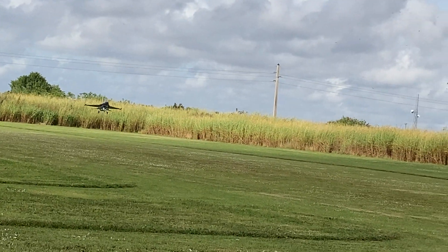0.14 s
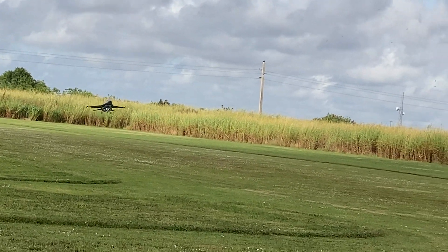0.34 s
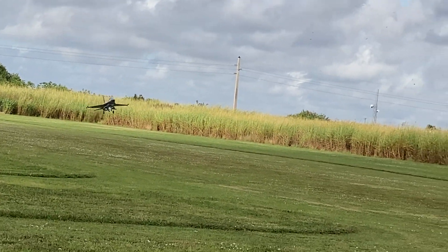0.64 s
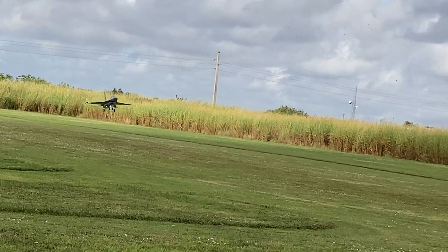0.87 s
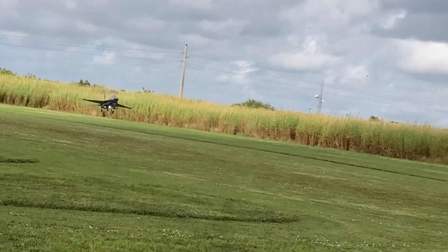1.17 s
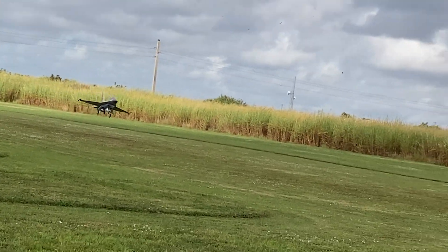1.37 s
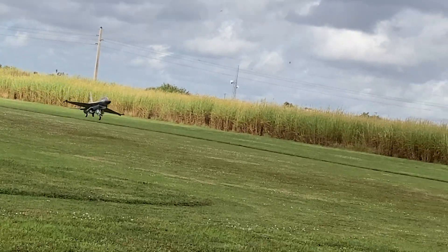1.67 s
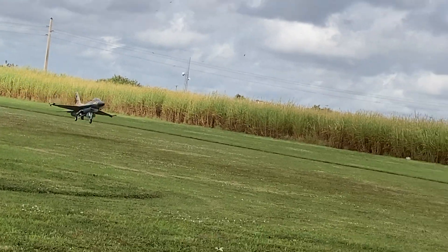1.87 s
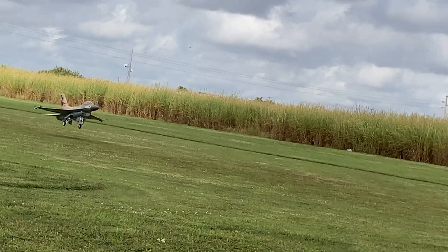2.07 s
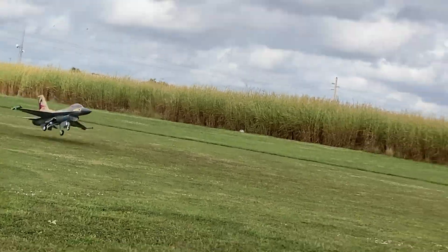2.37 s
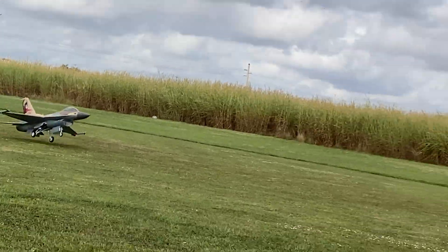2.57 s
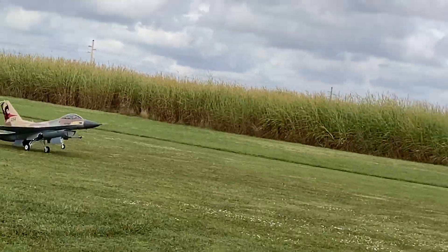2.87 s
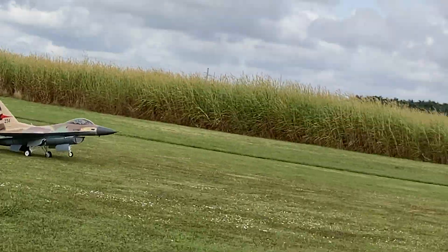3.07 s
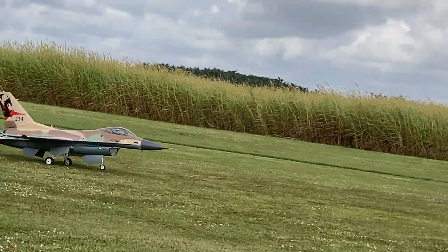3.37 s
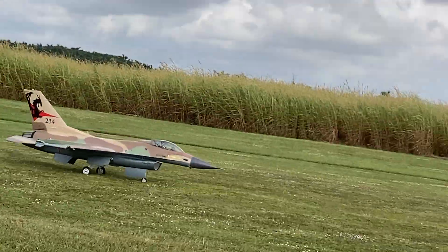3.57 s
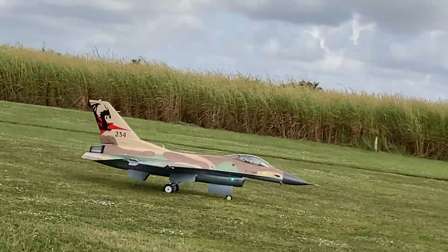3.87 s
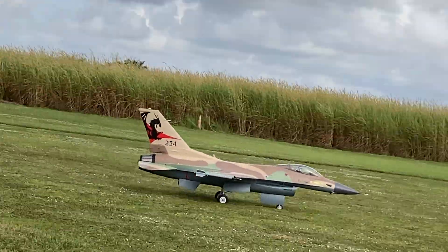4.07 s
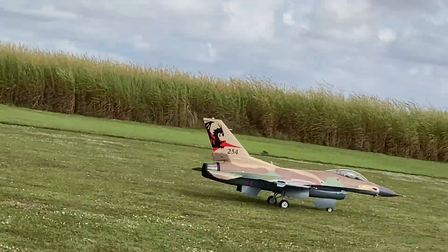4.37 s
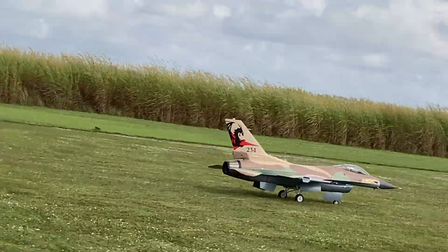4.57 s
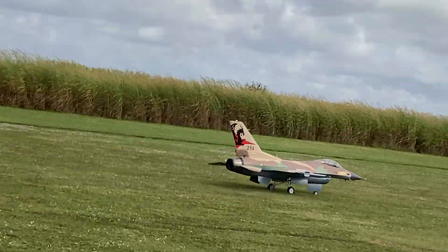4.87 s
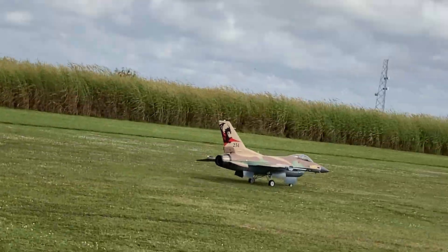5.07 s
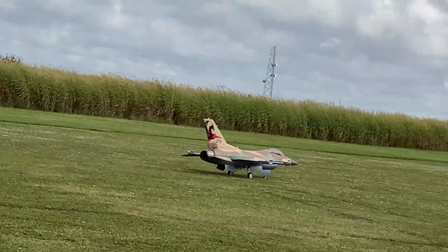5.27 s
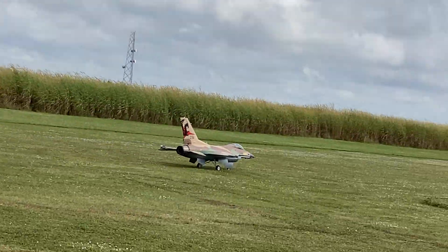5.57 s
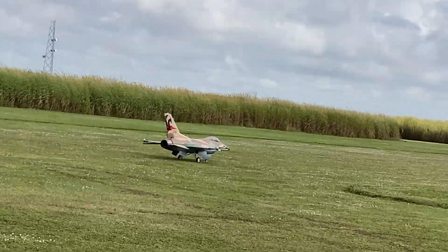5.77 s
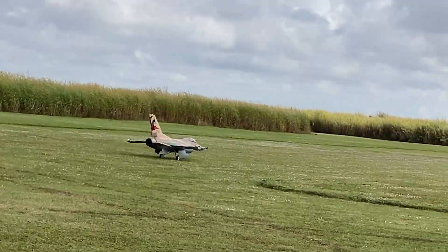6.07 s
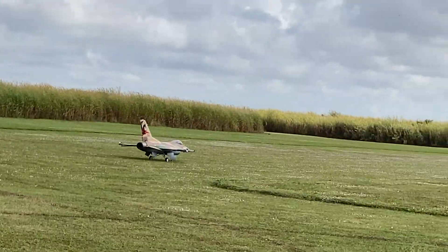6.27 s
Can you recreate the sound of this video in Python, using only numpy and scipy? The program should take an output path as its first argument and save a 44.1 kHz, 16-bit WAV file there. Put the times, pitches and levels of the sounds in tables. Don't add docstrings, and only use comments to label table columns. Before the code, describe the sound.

Outdoors on a windy grass field, a model jet approaches with a thin, very high turbine whine over airy hiss. From 0 to 1.6 seconds the pitch climbs, twinkling and wavering, with a low wind moan and a thump at 0.2. A faint dove note ends at the start; another rises at 1.4. Whine and roar peak sharply around 1.7 with a gust thump, then the pitch slides down continuously. Piercing higher whine flares near 2.5 and 3.4 amid flickering hiss, soft wheel scuffs and small wind thuds between 2.6 and 3.7. The roar thins to its quietest near 3.5. From about 4.1 a rougher exhaust wash returns with low rolling rumble as the tail turns toward the microphone. Heavy gust blows strike at 5.15 to 5.35; then the jet recedes, whine sinking and fading, grass rustling, a tiny tick at 6.1 and a last thump at 6.36.

```python
import sys
import numpy as np
from scipy import signal
from scipy.fft import rfft, irfft, next_fast_len
from scipy.io import wavfile
from scipy.ndimage import uniform_filter1d

SR = 44100
rng = np.random.default_rng(int(sys.argv[2]) if len(sys.argv) > 2 else 0)


def boost(x):
    u = np.asarray(x, float) / 20
    return 10 ** u


def store_pcm(level_fs):
    pcm = np.round(np.clip(level_fs, -1, 1) * 32767).astype(np.int16)
    wavfile.write(sys.argv[1], SR, np.atleast_2d(pcm).T)


N = 283122

# centre in seconds, half width in seconds, second blade order in dB, hiss in dB.
EDDIES = [(0.182, 0.033, 10, 8), (0.183, 0.067, 0.2, -15), (0.244, 0.03, -5.4, 3), (0.509, 0.19, -13.5, -8),
          (1.107, 0.041, 5.5, 4.8), (1.318, 0.061, -13, 1), (1.529, 0.09, -5.2, -9),
          (1.578, 0.028, -11.9, 2.8), (1.686, 0.082, -13, -6.1), (1.978, 0.022, -22, -5.5),
          (1.983, 0.035, 11.1, 11), (2.132, 0.013, -12.7, -2.5), (2.219, 0.03, 4.5, 1.5),
          (2.31, 0.057, -7, -11.0), (2.662, 0.03, 15, 10.5), (2.743, 0.026, -12, -9),
          (2.795, 0.05, 4, 12.5), (2.924, 0.088, -10.5, 3), (2.936, 0.045, 12, 9.5),
          (3.044, 0.021, -18, -12), (3.317, 0.074, -11.5, -5.5), (3.416, 0.051, 3.5, -2.5),
          (3.645, 0.084, 10.5, 2), (4.789, 0.11, -19, 8), (5.043, 0.17, -16, 12.5), (5.255, 0.028, 8, 4.5),
          (5.366, 0.046, 3, 7), (5.461, 0.041, 1, 3)]


def read(points, hz):
    f, value = np.transpose(points)
    return np.interp(np.log(hz + 1), np.log(f + 1), value)


def curve(rows, t):
    s, *columns = np.transpose(rows)
    return np.array([np.interp(t, s, c) for c in columns])


def arcs(points, t):
    s, v = np.transpose(points)
    slope = np.gradient(v, s)
    i = np.clip(np.searchsorted(s, t) - 1, 0, len(s) - 2)
    span = np.diff(s)[i]
    u = (t - s[i]) / span
    rise = u * u * (3 - 2 * u)
    bend = span * u * (1 - u) * (slope[i] * (1 - u) - slope[i + 1] * u)
    return v[i] + (v[i + 1] - v[i]) * rise + bend


def bumps(rows, t):
    s, width, *columns = np.transpose(rows)
    bells = np.exp(-((t - s[:, None]) / np.maximum(width, .01)[:, None]) ** 2)
    return np.array(columns) @ bells


def wander(shape, *spans):
    x = rng.standard_normal(shape)
    for axis, span in enumerate(spans):
        for _ in range(2):
            x = uniform_filter1d(x, int(span), axis)
    return x / x.std()


def slow(span):
    knots = np.arange(0, N + 32, 32)
    return np.interp(np.arange(N), knots, wander(len(knots), span / 32))


def add(mix, s, sound):
    part = mix[round(s * SR):][:len(sound)]
    part += sound[:len(part)]


def tone(hz, db):
    turns = np.cumsum(hz) / SR + rng.random()
    return np.sqrt(2) * boost(db) * np.sin(2 * np.pi * turns)


def nozzle_db(hz, t):
    # centre in Hz, width in Hz, level in dB.
    resonances = [(762, 440, -5), (1270, 34, 21), (1754, 99, 12), (2320, 175, 3), (3650, 2100, 1),
                  (6010, 1440, -2)]
    # time in seconds, share of the nozzle colour (below zero while the nose points here).
    turned = [(0, -0.64), (.8, -0.41), (1.3, 1), (2.1, 0.0056), (2.6, 0.27), (3.5, -0.68), (4.2, 0.42),
              (5.3, 0.52), (5.6, 1), (6.42, 0.33)]
    colour = sum(db * np.exp(-((hz - centre_hz) / width) ** 2) for centre_hz, width, db in resonances)
    return colour[:, None] * curve(turned, t)


def turbulence(level_db, bands, colour, size, patchy_db, flicker_db, ridge_db):
    # frequency in Hz, likeness of the two channels from 0 to 1.
    likeness = [(40, 0.36), (150, 0.47), (400, 0.89), (900, 0.97), (1500, 0.83), (2150, 0.9), (2450, 0.98),
                (3500, 0.82), (4500, 0.9), (5200, 1), (5600, 0.69), (6050, 0.14), (6600, 0.71),
                (9000, 0.98)]
    overlap = size * 3 // 4
    hz, t, (a, b) = signal.stft(rng.standard_normal((2, N)), SR, nperseg=size, noverlap=overlap)
    low, high = np.transpose(bands)
    density_db = level_db(t) - 10 * np.log10((high - low) / (SR / 2))[:, None]
    plateaus = np.ravel([low ** .8 * high ** .2, low ** .2 * high ** .8], "F")
    blend = np.array([read(list(zip(plateaus, np.repeat(row, 2))), hz) for row in np.eye(len(bands))])
    field_db = blend.T @ density_db + read(colour, hz)[:, None] + nozzle_db(hz, t)
    field_db += patchy_db * wander(a.shape, 5, 8)
    field_db += flicker_db * wander(a.shape, 28, 3)
    field_db += ridge_db * wander(a.shape, 2, 140)
    same = np.clip(read(likeness, hz), 0, 1)[:, None]
    z = np.array([a, same * a + np.sqrt(1 - same ** 2) * b]) * boost(field_db)
    return signal.istft(z, SR, nperseg=size, noverlap=overlap)[1][:, :N]


def roar_db(t):
    # time in seconds, loudness from thrust and distance in dB,
    # intake facing the microphone in dB.
    thrust = [(0, -49, 8), (.286, -39, 9), (.719, -36.5, 0.2), (.831, -45, -3), (1.17, -44, 2.5),
              (1.666, -25.5, 3.5), (1.997, -33, -8), (2.456, -43, 15), (2.53, -52.5, 0.5),
              (3.487, -61, 12.5), (3.605, -56.5, 3.5), (4.039, -53.5, -1), (4.105, -42.5, -12),
              (4.472, -41, 3), (4.992, -37.5, -14.5), (5.36, -38.5, -14), (5.43, -49.5, -4),
              (6.42, -45, -8.5)]
    # offset in dB, share of loudness, share of facing, share of eddy hiss.
    layers = [
        (-18, 0.61, 0.094, 0.12),
        (4.5, 1.0945, 0.37, 0.36),
        (-8, 0.82, 0.92, 0.6),
        (-1.5, 1.074, 1.35, 1.73),
    ]
    return np.array(layers) @ [np.ones_like(t), *curve(thrust, t), bumps(EDDIES, t)[1]]


def jet_roar():
    # low edge in Hz, high edge in Hz.
    roar_bands = [(450, 2400), (2400, 7000), (7000, 11000), (11000, 15500)]
    # frequency in Hz, colour over the roar in dB.
    roar_colour = [(300, -53), (420, -17), (560, -0.5), (900, -1), (1150, -3.5), (1600, -2.5), (2200, -4.5),
                   (3200, 2), (4300, -2.5), (5900, -6), (7700, -1), (10000, 2.5), (12500, 3), (15000, -6.5)]
    return turbulence(roar_db, roar_bands, roar_colour, size=512,
                      patchy_db=1.16, flicker_db=0.51, ridge_db=3.5)


def wind_db(t):
    # time in seconds, gust strength in dB, rumble of wheels and exhaust in dB.
    gusts = [(0, -40.5, -55), (.4, -37, -50.5), (.85, -51.5, -55), (1.12, -50, -58.5), (1.5, -40, -52),
             (2.0, -43.5, -51.5), (2.55, -49, -52), (2.7, -43.5, -51), (3.2, -67, -50.5), (3.55, -45, -50),
             (3.8, -53.5, -48), (4.3, -52.5, -38.5), (4.65, -45, -39.5), (4.88, -49.5, -41.5),
             (5.35, -36.5, -41.5), (5.45, -49, -43.5), (6.1, -41.5, -50.5), (6.42, -42, -50)]
    gust_db, roll_db = curve(gusts, t)
    quick_db = 1 + 0.31 * gust_db + 0.64 * roll_db
    return np.array([gust_db, quick_db, roll_db])


def wind_and_rumble():
    # low edge in Hz, high edge in Hz.
    wind_bands = [(30, 90), (90, 200), (200, 450)]
    # frequency in Hz, colour over the wind in dB.
    wind_colour = [(15, -40), (30, -33), (48, -6), (65, 7.5), (88, -11.5), (112, 8.5), (150, -5.5),
                   (260, 2.5), (400, -4.5), (520, -26.5)]
    return turbulence(wind_db, wind_bands, wind_colour, size=2048,
                      patchy_db=2.07, flicker_db=0.36, ridge_db=3.0)


def grass(t):
    # frequency in Hz, density in dB per Hz.
    rustle = [(300, -110), (900, -100.5), (2500, -90.5), (4500, -96), (5800, -96), (7000, -99),
              (12000, -112)]
    # centre in seconds, half width in seconds, swell in dB.
    scuffs = [(2.66, 0.069, 8.5), (3.19, 0.03, 6), (3.38, 0.044, 6.5), (3.68, 0.079, 8.5), (5.9, 0.39, 3.5)]
    size = next_fast_len(N)
    hz = np.fft.rfftfreq(size, 1 / SR)
    spectrum = rfft(rng.standard_normal((2, size))) * boost(read(rustle, hz)) * np.sqrt(SR / 2)
    return irfft(spectrum, size)[:, :N] * boost(bumps(scuffs, t))


def compressor(t, twinkle_db=2.0, wobble_hz=1.6):
    # time in seconds, blade passing rate in Hz.
    spool = [(0, 5098), (.3, 5462), (.6, 5928), (.77, 6262), (.9, 6588), (1.15, 7212), (1.4, 7683),
             (1.62, 7827), (1.85, 7705), (2.1, 7398), (2.5, 6833), (2.9, 6296), (3.4, 5756), (3.9, 5256),
             (4.4, 4841), (4.9, 4566), (5.6, 4319), (6.42, 4140)]
    # time in seconds, first order in dB, second order in dB.
    whine = [(-0.0, -48, -35.5), (0.216, -67, -40.5), (0.254, -41, -27.5), (0.747, -45, -10.5),
             (0.845, -74, -33.5), (0.932, -37, -25), (1.243, -38, -30), (1.714, -20.5, -14.5),
             (2.016, -40.5, -35.5), (2.491, -37, -15.5), (2.588, -51, -41.5), (2.768, -49.5, -19.1),
             (3.376, -57.5, -14.5), (3.593, -55.5, -48.5), (4.407, -56.5, -35.5), (4.954, -44, -36),
             (6.077, -75, -51.5), (6.42, -51, -39.5)]
    # time in seconds, level in dB.
    third = [(0, -38), (.1, -39), (.14, -52), (3.9, -59), (4.35, -42.5), (4.62, -37), (5.0, -44),
             (5.2, -63), (6.42, -62)]
    # centre in seconds, half width in seconds, dB.
    echo_beats = [(.5, .03, -21), (1.43, .03, -18), (2.04, 0.034, -23), (2.15, 0.058, 8),
                  (2.3, 0.063, -4.5), (2.47, 0.039, 11.5), (3.05, 0.034, -31), (3.5, 0.042, -6),
                  (3.68, .06, -3), (.68, .04, 5.5), (4.0, 0.076, -15), (4.68, .03, 0), (5.25, .04, -7),
                  (5.58, .06, 9)]
    blade_hz = arcs(spool, t)
    coarse = t[::64]
    first_db, second_db = curve(whine, coarse)
    first_db = first_db + bumps(echo_beats, coarse)[0]
    second_db = second_db + bumps(EDDIES, coarse)[0]
    out = np.zeros(N)
    for order, db in enumerate([first_db, second_db, *curve(third, coarse)], 1):
        order_hz = order * (blade_hz + wobble_hz * slow(300))
        out += tone(order_hz, np.interp(t, coarse, db) + twinkle_db * slow(480))
    return out


def moan(t, pitch_hz=67.3, waver_hz=1.6):
    # time in seconds, level in dB.
    eddy_tone = [(0, -38), (.5, -49), (.64, -31), (.85, -41), (1.17, -42.5), (1.33, -35), (1.44, -45.5),
                 (1.6, -39.5), (2.5, -51)]
    dying = np.clip((eddy_tone[-1][0] - t) / 0.15, 0, 1)
    return tone(pitch_hz + waver_hz * slow(5900), curve(eddy_tone, t)[0]) * dying


def small_sounds():
    # start in seconds, length in seconds, start in Hz, end in Hz, level in dB.
    notes_heard = [
        (0.0, 0.054, 550, 560, -50),
        (1.40, 0.14, 496.5, 552, -48.5),
        (6.112, 0.0032, 6500, 4760, -35),
    ]
    out = np.zeros(N)
    for s, length, from_hz, to_hz, db in notes_heard:
        along = np.arange(0, 1, 1 / (length * SR))
        swell = np.sin(np.pi * along) ** 0.47
        add(out, s, tone(from_hz + (to_hz - from_hz) * along, db) * swell)
    return out


def thumps(cycles=0.56, glide=0.22):
    # start in seconds, peak in dB, pitch in Hz, snap in dB relative to the peak.
    blows = [(0.198, -30, 141, -25), (1.708, -25.5, 102, -14.5), (2.014, -44, 100, 3),
             (2.648, -29.5, 134, -5), (2.672, -34, 90, -10), (2.864, -45.5, 91, 5), (2.94, -39, 84, -6),
             (3.054, -44.5, 72.6, -1), (3.179, -44.5, 103, -7), (5.156, -34, 85, -15),
             (5.179, -30, 92.8, -15), (5.233, -22.5, 109.5, -16), (5.31, -24.5, 103, -24),
             (5.348, -29, 71, -14), (5.439, -49, 86.1, -9), (6.356, -31, 98, -12)]
    out = np.zeros(N)
    t = np.arange(3000) / SR
    for (s, db, hz, snap_db), start in zip(blows, rng.random((len(blows), 2))):
        turns = t * hz - 1.3
        swing = np.sin(2 * np.pi * (turns - glide * turns ** 2 + start[0]))
        blow = np.exp(-(turns / cycles) ** 2) * swing
        late = t - 0.806 / hz
        snap = np.exp(-(late / 0.0071) ** 2) * np.sin(2 * np.pi * (270 * late + start[1]))
        add(out, s, boost(db + 6.0) * (blow + boost(snap_db) * snap))
    return out


def scene():
    t = np.arange(N) / SR
    broad = jet_roar() + wind_and_rumble() + grass(t)
    return broad + compressor(t) + moan(t) + small_sounds() + thumps()


def low_pass(x):
    return signal.sosfilt(signal.butter(12, 16940, fs=SR, output="sos"), x)


def record(dry):
    # frequency in Hz, right channel phase minus left in radians.
    channel_turn = [(0, -0.07), (245, -3), (1080, -14.6), (1300, -13.2), (1800, -11.9), (2050, -13),
                    (2400, -15.4), (3400, -15.9), (4700, -18.2), (5120, -18.4), (5420, -21.8), (5880, -22.1),
                    (6250, -26.3), (16000, -12.2)]
    # frequency in Hz, left minus right in dB.
    lean = [(60, -1.2), (300, -1.0), (800, 1.2), (2000, 0), (8000, .6), (9000, 0)]
    hz = np.fft.rfftfreq(next_fast_len(N + 2048), 1 / SR)
    size = 2 * (len(hz) - 1)
    half = boost(read(lean, hz) / 2) * np.exp(-.5j * np.interp(hz, *np.transpose(channel_turn)))
    channels = irfft(rfft(dry, size) * np.array([half, 1 / half]), size)[:, :N]
    return low_pass(channels)


dry = scene()
out = record(dry)
store_pcm(out)
```